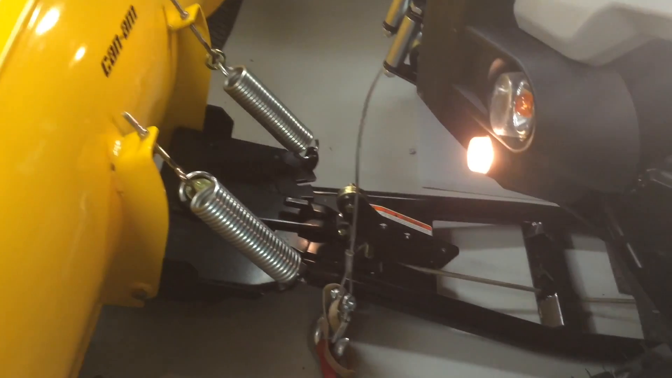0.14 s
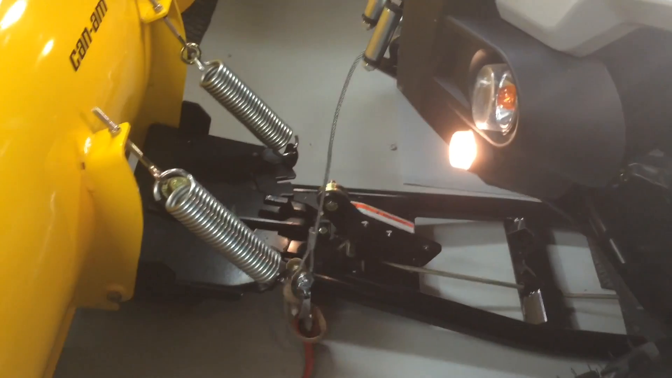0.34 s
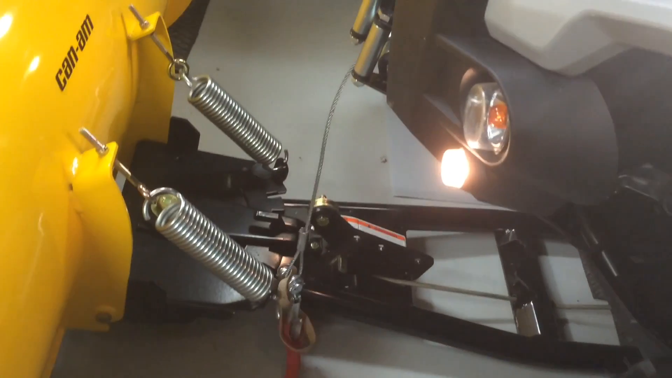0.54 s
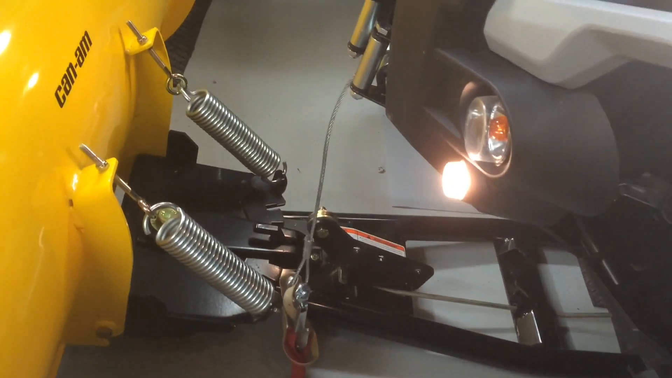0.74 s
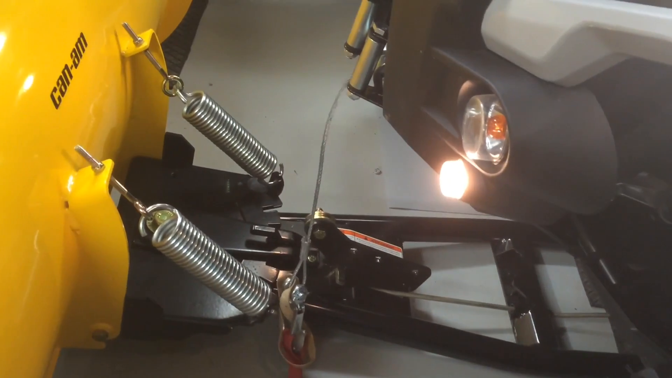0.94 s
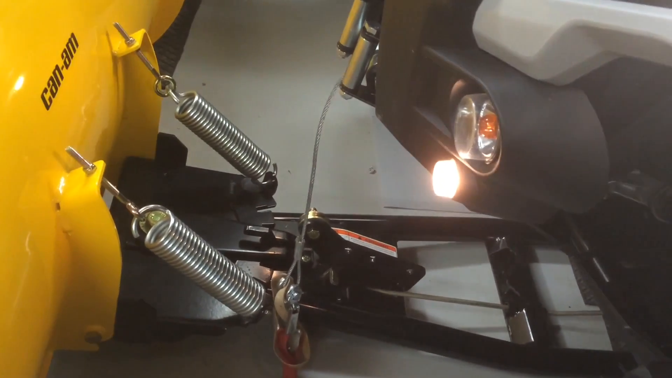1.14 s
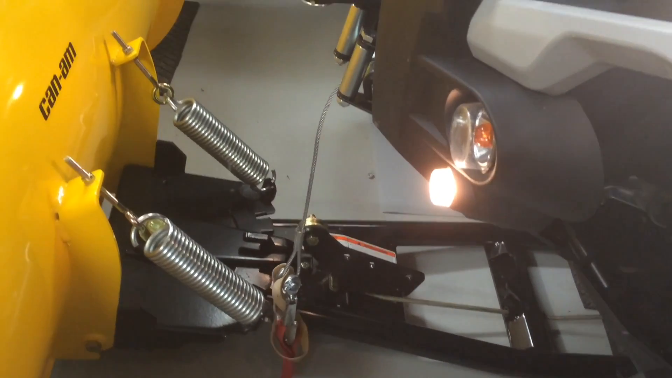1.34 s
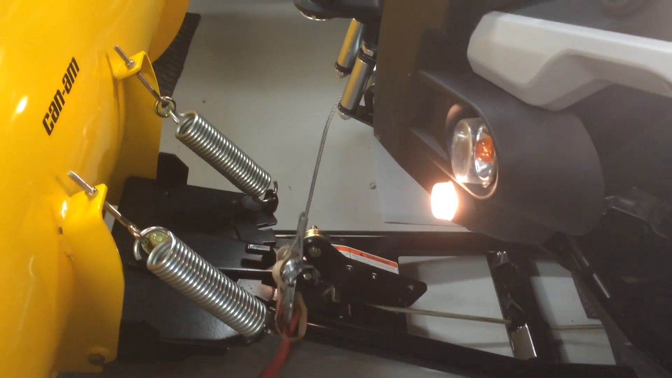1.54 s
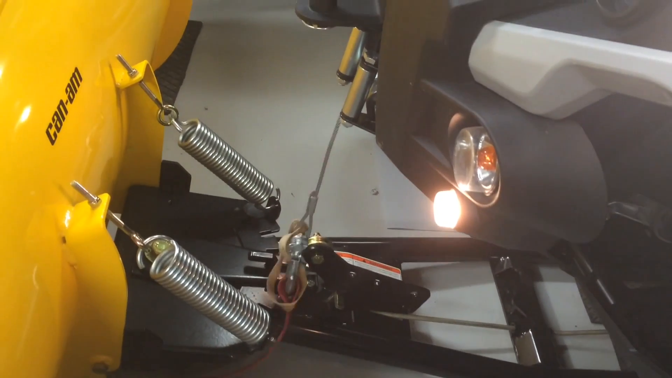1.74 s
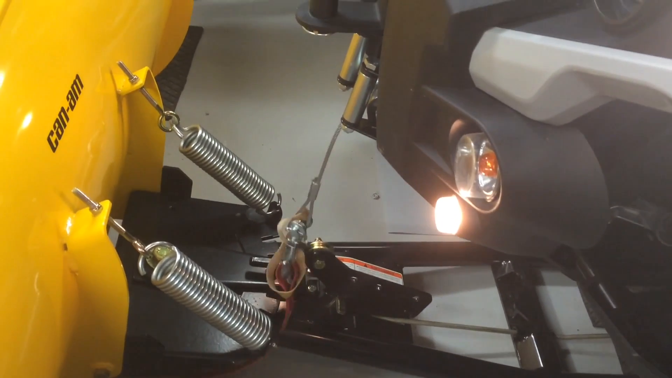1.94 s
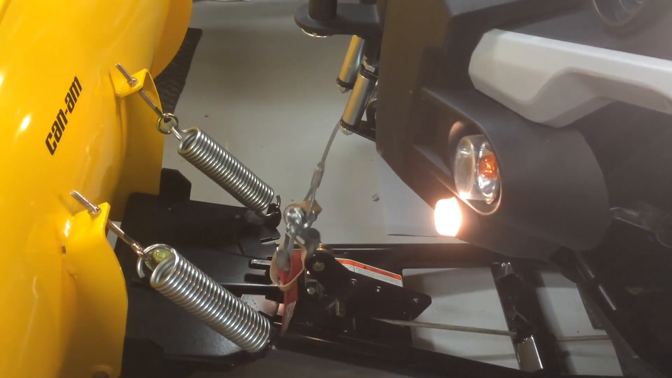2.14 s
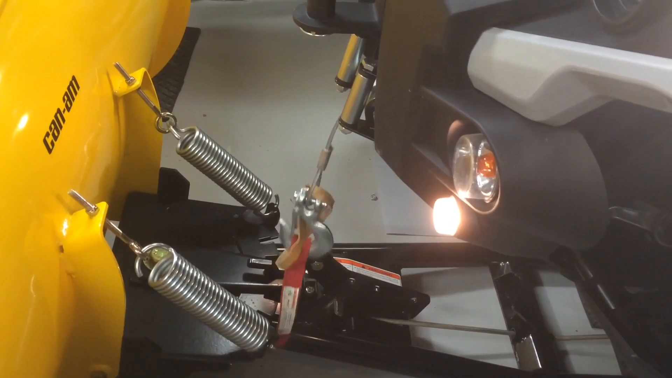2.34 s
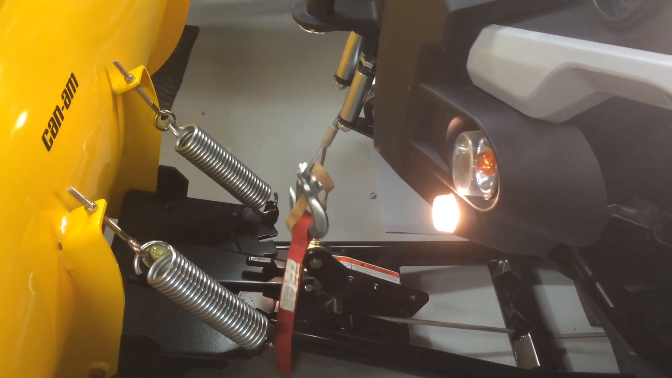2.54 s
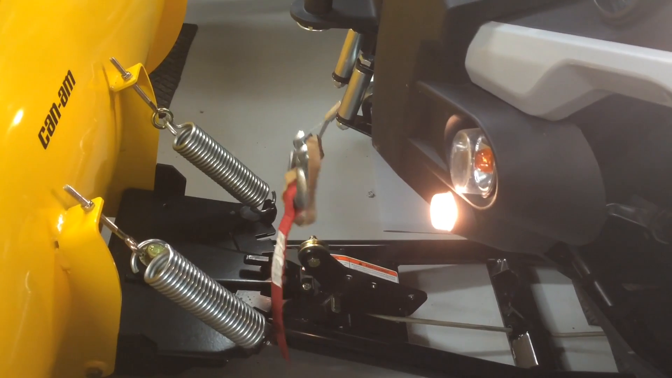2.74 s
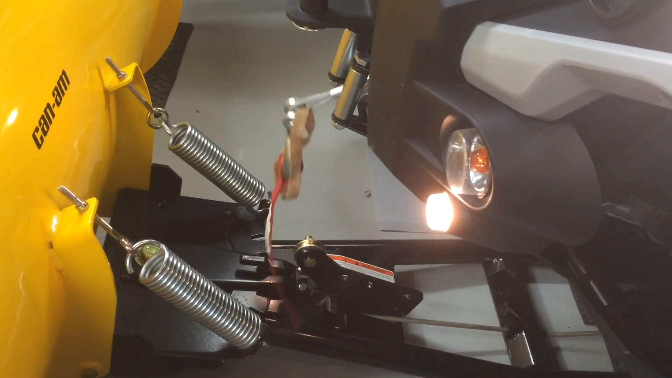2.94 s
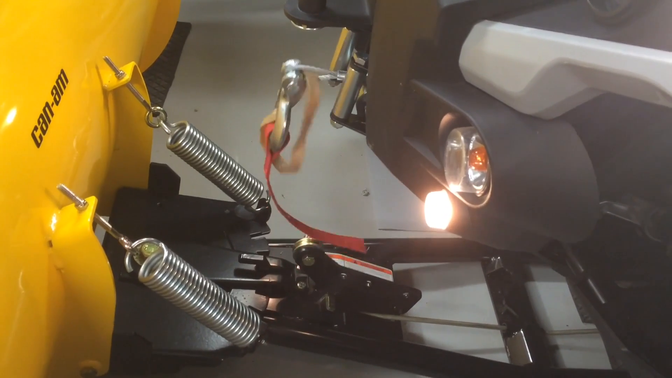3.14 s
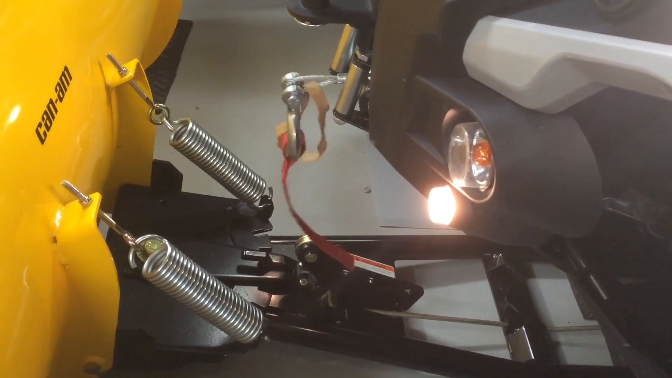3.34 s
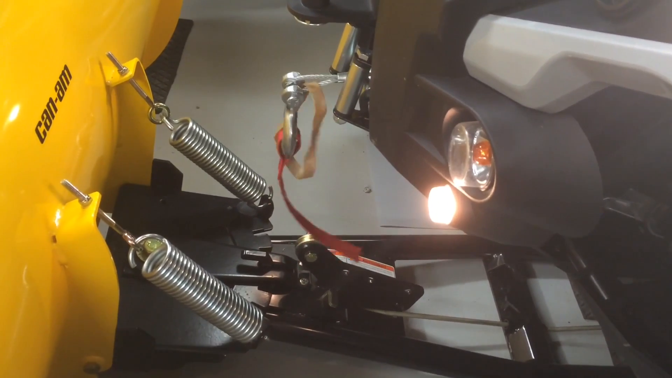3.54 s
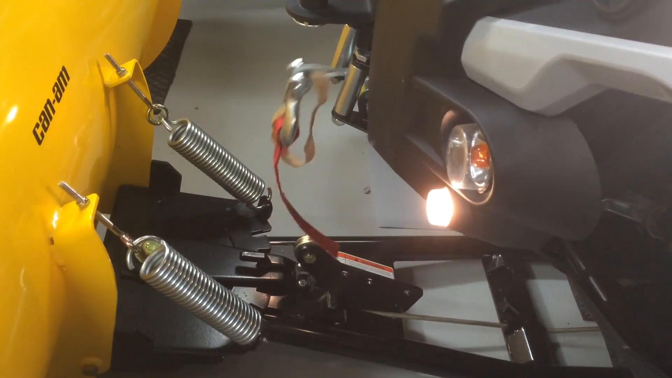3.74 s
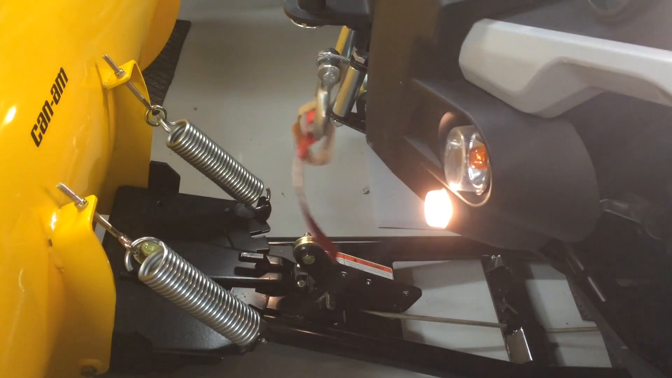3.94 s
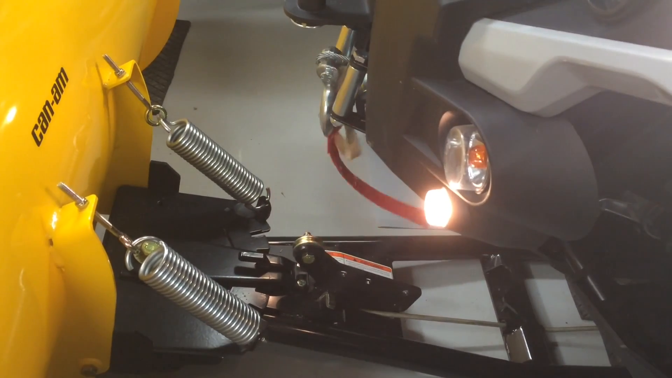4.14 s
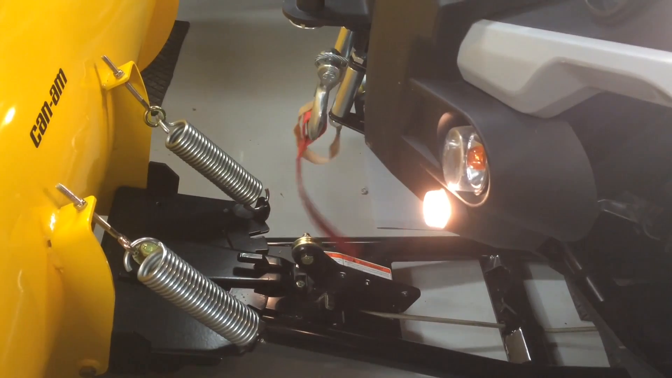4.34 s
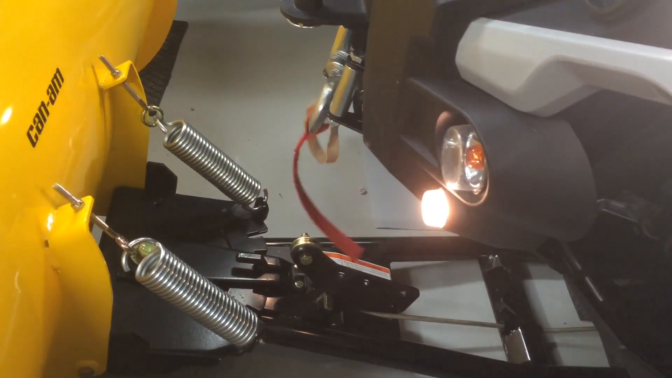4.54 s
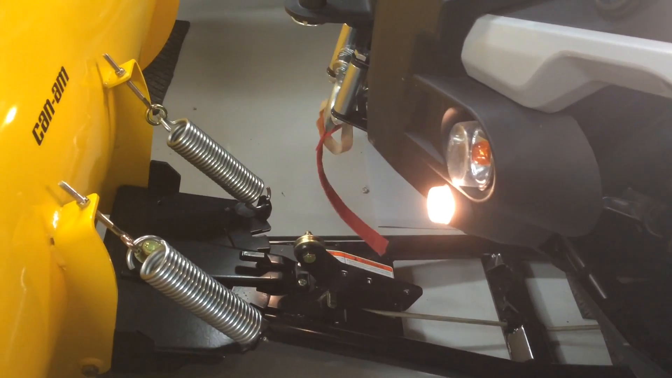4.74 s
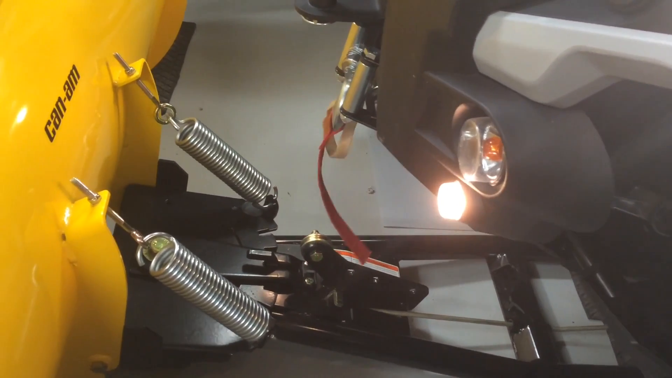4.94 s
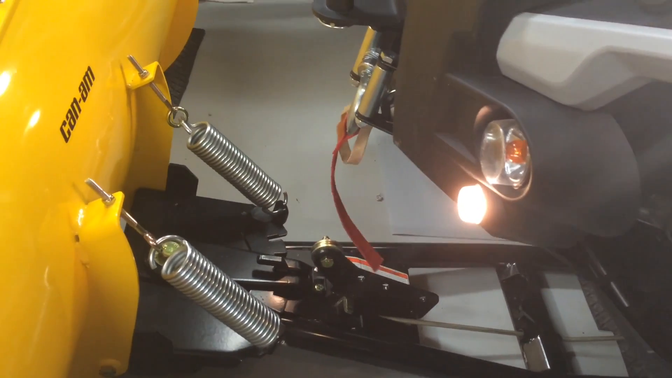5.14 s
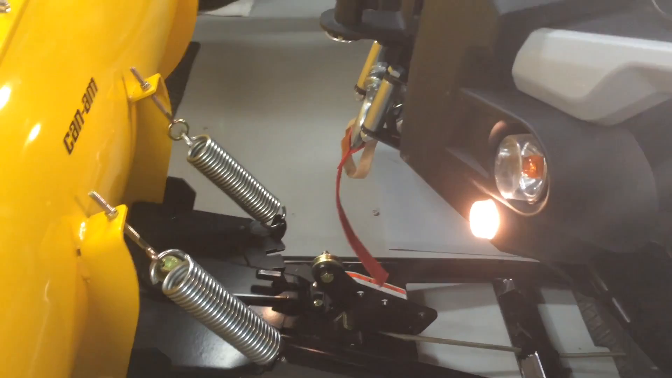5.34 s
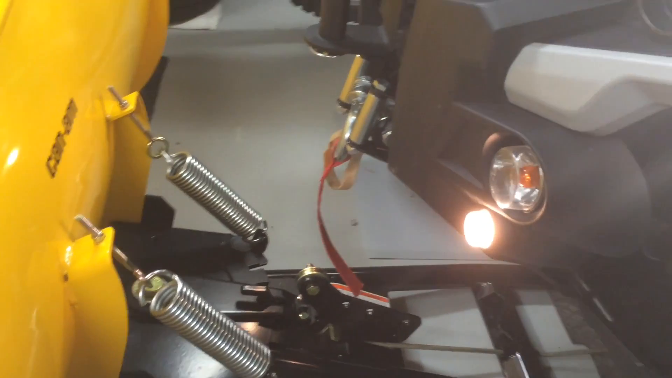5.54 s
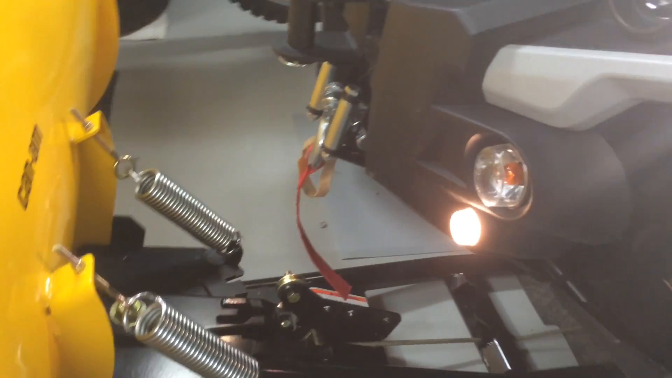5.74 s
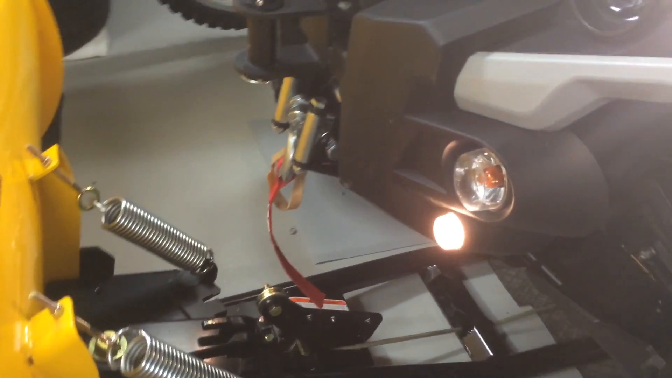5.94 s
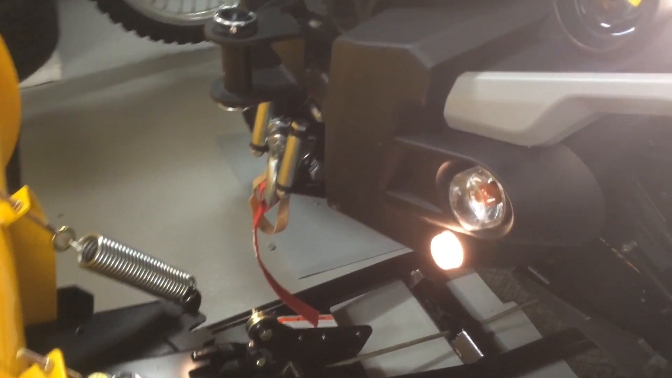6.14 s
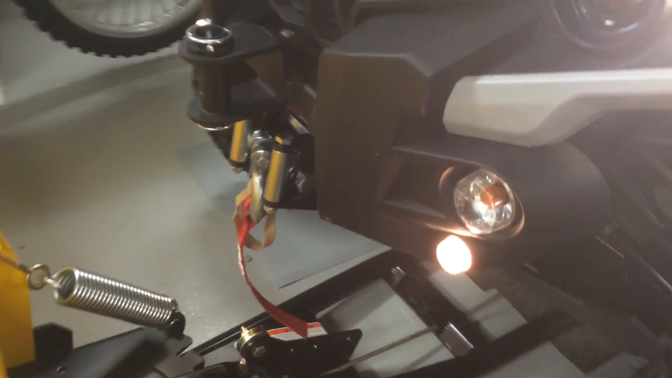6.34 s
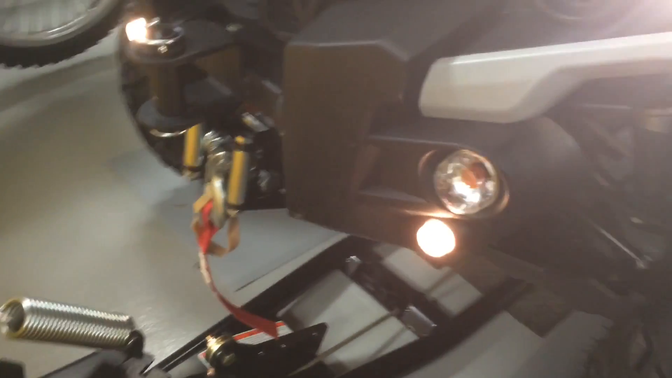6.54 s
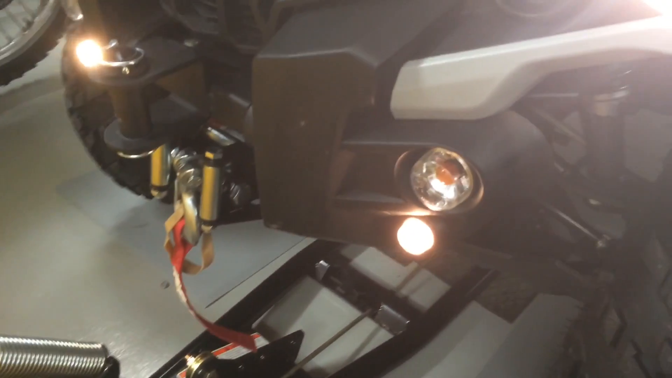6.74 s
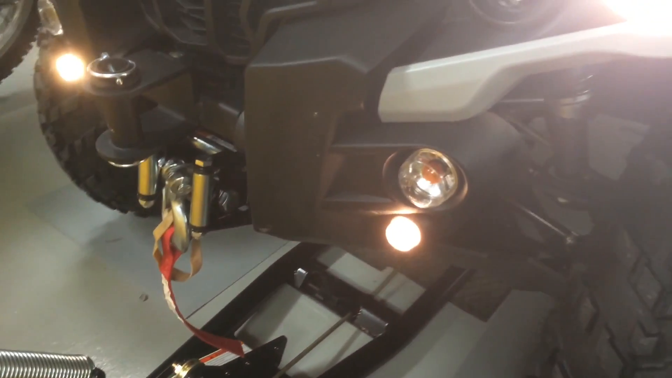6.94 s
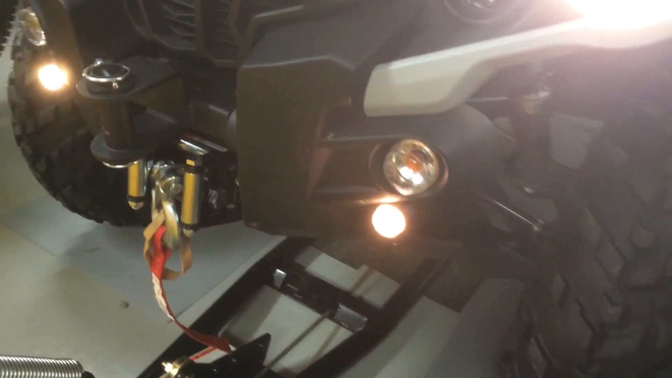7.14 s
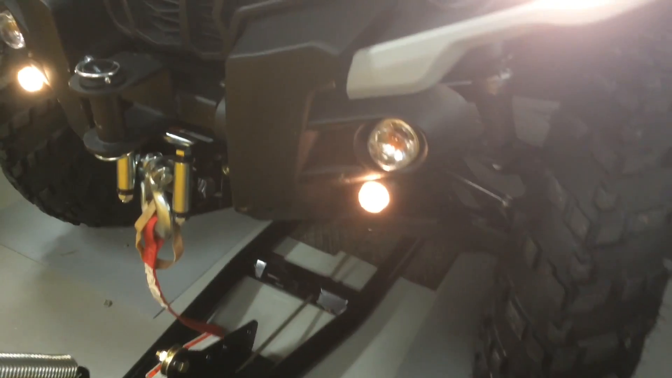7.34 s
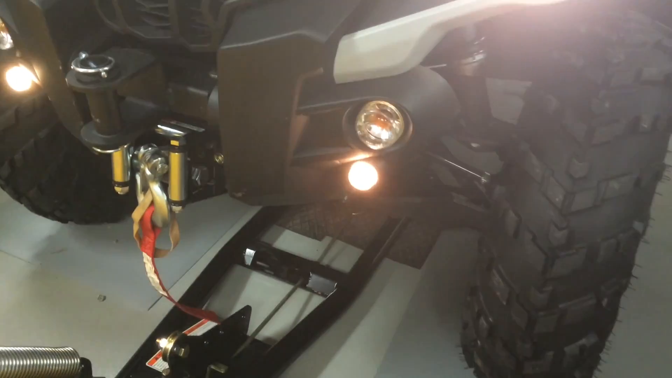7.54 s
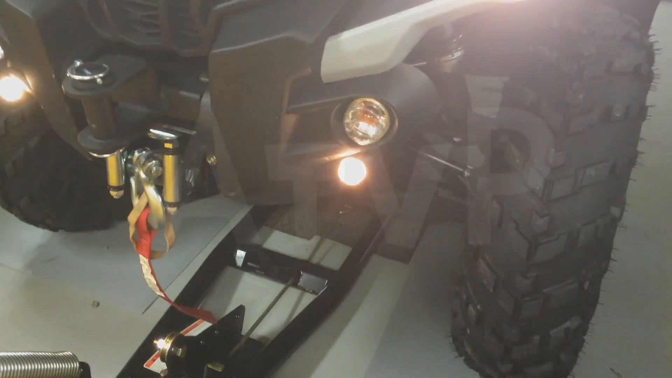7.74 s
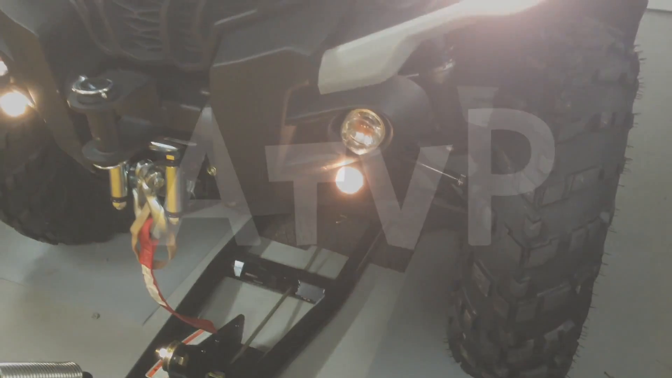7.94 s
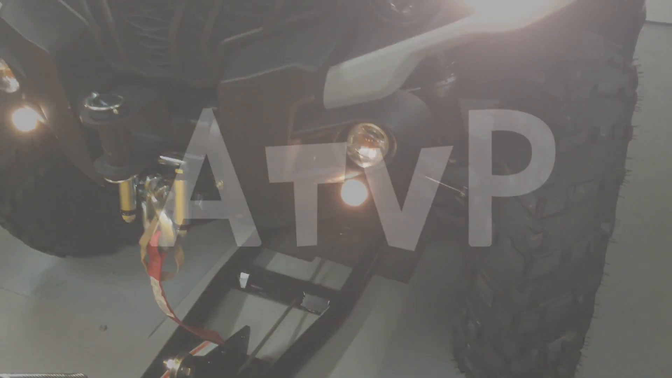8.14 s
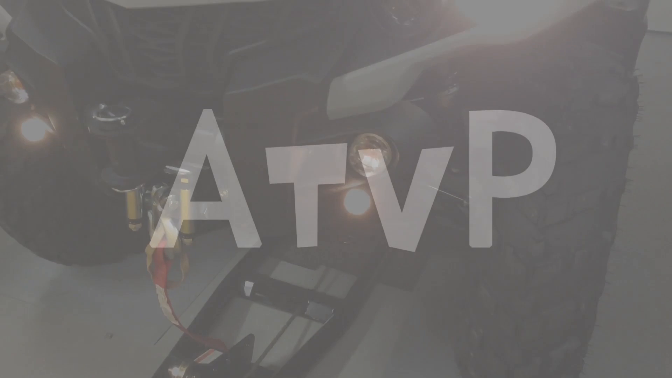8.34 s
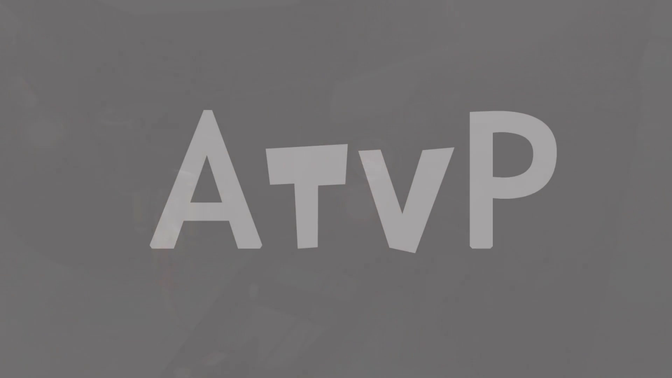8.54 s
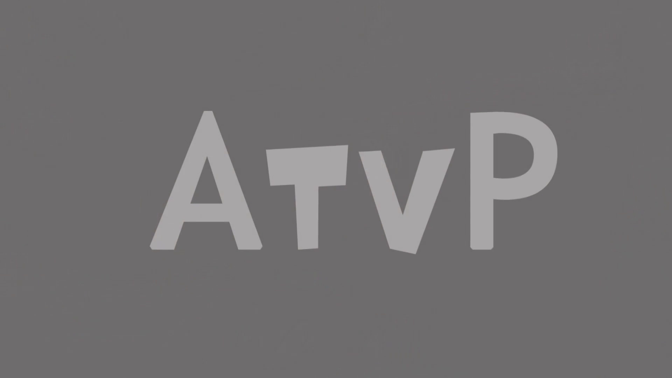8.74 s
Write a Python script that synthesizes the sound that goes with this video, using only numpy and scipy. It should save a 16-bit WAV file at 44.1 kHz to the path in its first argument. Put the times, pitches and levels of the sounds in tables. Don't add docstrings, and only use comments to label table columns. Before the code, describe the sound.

Sharp relay clacks start and stop a grinding winch motor, cable scraping and hook knocking metal, before faint taps and rustles over low hum fade away.

```python
import sys
import numpy as np
from scipy import signal
from scipy.fft import rfft, irfft, next_fast_len
from scipy.io import wavfile
from scipy.ndimage import map_coordinates

SR = 44100
rng = np.random.default_rng(int(sys.argv[2]) if len(sys.argv) > 2 else 0)


def volts(x):
    e = np.asarray(x, float) / 20
    return 10 ** e


def put_to_file(sound):
    columns = np.atleast_2d(sound).T
    safe = np.clip(columns, -1, 1)
    whole_steps = np.round(safe * 32767)
    wavfile.write(sys.argv[1], SR, whole_steps.astype(np.int16))


N = 387618
TIME = np.arange(N) / SR

# freq_hz, level_db (per Hz)
AIR = [(15, -33), (25, -9.5), (53, -7), (166, -18), (200, -18.5), (270, -21), (354, -22), (2050, -35.5),
       (2220, -39.5), (13600, -46.5), (16000, -56)]
# centre_hz, width_hz, level_db
DRONE_BANDS = [(97, 20, -8), (140, 36, -2.5), (196, 7.8, -2.5), (380, 260, -10.5)]
# on_s, off_s, slam_db, drop_db
RUNS = [
    (0.159, 0.674, 2, -4.5),
    (1.209, 3.086, 1, -4),
    (3.742, 3.987, 2.5, -4),
    (4.523, 4.664, 1.5, -5),
]
# mode_hz, level_db, t60_s
CASE = [(640, -3, .08), (860, 0, .06), (980, -2, .06), (1400, -3, .06), (1650, -5, .06), (2180, -4, .05),
        (3200, -4, .05), (5000, -8, .04), (5900, -10, .04)]
ORDERS = [2, 4, 9.96, 11, 12, 16, 19.92, 48]
ORDER_DB = [-52, -46, -42, -43, -45, -35.5, -39, -36]
# time_s, effort_db
LOAD = [(.2, -24), (.64, -27.5), (1.26, -24.5), (1.44, -28.5), (1.54, -22), (1.7, -19.5), (1.96, -25.5),
        (2.04, -22.5), (2.3, -21.5), (2.45, -23.5), (2.6, -28), (2.78, -25.5), (3.06, -29.5), (3.8, -28),
        (3.95, -26.5), (4.57, -26)]
# freq_hz, level_db (per Hz)
GEARS = [(240, -59.5), (400, -29.5), (734, -4.5), (1080, -5), (1180, -2.5), (1280, -6.5), (1540, -1.5),
         (2570, -13), (4000, -14.5), (5200, -40.5), (8800, -120)]
# freq_hz, level_db (per Hz)
SCRAPE = [(1180, -32.5), (2000, -2), (2690, -7.5), (4050, -4.5), (5780, -6.5), (10600, -12), (14900, -23.5),
          (15600, -34), (16000, -58)]
# freq_hz, level_db (per Hz)
DRUM = [(35, -44), (60, -18), (113, -8.5), (182, 2.5), (264, -6), (297, -9.5), (520, -12), (680, -37.5),
        (1140, -120)]
# centre_hz, width_hz, level_db
HOUSING = [(758, 14, 2.5), (890, 22, -3.5), (1210, 26, -7), (1511, 17, 1.5), (1600, 11, -4.5),
           (1708, 18, -8.5), (2160, 40, -10.5), (3170, 73, -6), (4210, 99, -12.5), (4660, 73, -16),
           (5030, 67, -19), (5920, 68, -19.5)]
# start_s, peak_db, body_hz, hardness_db
HOOK = [
    (.427, -1.5, 2090, 2),
    (.436, -6.5, 1742, 2.5),
    (.455, -11.5, 1499, -2),
    (.477, -12, 1800, -5),
    (.637, -7, 784, -6.5),
]
# mode_hz, level_db, t60_s
STEEL = [(410, -6, .15), (603, -4, .2), (800, -4, .12), (1420, -2, .15), (1970, 0, .15), (2100, -5, .2),
         (2500, -6, .15), (3800, -10, .07), (5020, -11, .1), (5900, -11, .08)]
# start_s, level_db
RINGS = [
    (0.426, -48.5),
    (.638, -39),
]
# mode_hz, level_db, t60_s
BLADE = [(470.2, -4.5, 1.2), (800, -3.5, 1.5), (822, 2, 2.2), (1061, -5, .7), (1174, -12, 1.1),
         (1427, -12, 1.5), (1523, -10.5, 1.5), (1745, -9.5, 2), (1938, -12, 2.6), (2089, -2.5, 2.5),
         (2118, -2.5, 2.4), (2500, -11, 1.9), (5389, -27, 2)]
# mode_hz, level_db, t60_s
ROLLERS = [(820, -9, 2.5), (1168, -5, 4), (1745, -5, 2.5), (2090, -6.5, 2.5), (2143, -13, 1.5),
           (2500, -13, 2)]
# start_s, peak_db
DRAGS = [(0.599, -23), (1.545, -17), (1.63, -18.5), (1.998, -19.5), (2.065, -16), (2.159, -19.5),
         (2.218, -18), (2.295, -15), (2.4, -17.5)]
# start_s,
# peak_db, body_hz, hardness_db
JOLTS = [(1.712, -4.5, 1300, -5), (1.724, -7, 1150, -4), (1.817, -8, 960, -0.5), (3.103, -10, 900, -3),
         (4.009, -15, 1000, -4.5), (4.039, -10, 1050, -0.5), (4.697, -10, 960, 7), (4.711, -19, 700, -16)]
# start_s, peak_db, body_hz, hardness_db
THUMB = [
    (1.104, -61, 3020, 8.5),
    (4.147, -29, 1528, 1),
    (4.481, -61, 1187, 1.5),
]
# start_s, peak_db, body_hz, hardness_db
STEP = [
    (7.403, -43, 900, -6),
    (7.413, -33.5, 1270, 0.5),
    (7.43, -33.5, 827, -4),
]
# start_s, peak_db, body_hz, hardness_db
TAPS = [(3.239, -49, 2540, 5), (3.319, -50, 2520, 7), (4.307, -55.5, 2480, 9), (4.93, -53.5, 1500, 4),
        (5.383, -59.5, 2500, 7), (5.47, -54, 1300, 3), (6.028, -50.5, 800, -6.5), (6.159, -58, 2500, 3),
        (6.329, -48.5, 750, -7), (6.605, -44.5, 1800, 6.5), (7.11, -50, 740, -5), (7.931, -59, 1200, -2),
        (8.116, -52.5, 1498, 3.5), (8.187, -54, 1250, -10), (8.313, -64, 2000, 4.5),
        (8.509, -53, 1800, -1.5)]
# peak_s, rise_s, level_db, brightness_db
RUSTLES = [(4.94, 0.024, -61, 1), (5.489, 0.019, -57.5, -4), (5.87, 0.048, -55.5, 2.5),
           (6.04, 0.031, -66, 1.5), (6.36, 0.036, -64, 2), (6.62, 0.085, -56.5, 4), (7.14, 0.031, -63.5, 0),
           (7.429, 0.011, -43, -6), (8.13, .02, -55, -8), (8.33, 0.017, -63, 0)]
# freq_hz, t60_s
GARAGE = [(150, 0.57), (1000, 0.48), (4000, 0.35), (12000, .22)]

SHAFT_HZ = 75.87
SWITCH_LEAD_S, SWITCH_DB = .026, -49.5
TOUCH_LEAD_S, TOUCH_DB = .0115, -4
ARC_LEAD_S, ARC_DB = .017, -3.5
SCRAPE_DB, SCRAPE_GROWS, DRUM_DB, DRUM_GROWS = -3.5, 0.99, -14.5, 0.21
STIR_DB, STIR_BRIGHT_DB = -77.5, -0.5
RUSTLE_FALL, RUSTLE_TAIL_S = 0.36, 0.042
HUM_DB, DRONE_DB, RUMBLE_DB = -50.5, -56, -57.5
BEAT_S, BEAT_TOP_S, BEAT_DEPTH = 2.7, 7.2, .45
FADE_FROM_S, FADE_TO_S = 7.6, 8.655


def unit(x):
    return x / np.sqrt(np.mean(x ** 2) + 1e-20)


def along(points, hz):
    f, v = np.transpose(points)
    return np.interp(np.log(hz + 1), np.log(f + 1), v)


def wobble(rate, size=N):
    coarse = TIME[:size:16]
    knots = rng.standard_normal(int(size * rate / SR) + 4)
    return np.interp(TIME[:size], coarse, map_coordinates(knots, [coarse * rate]))


def filtered(x, response):
    m = next_fast_len(N + SR // 2)
    return irfft(rfft(x, m) * response(np.fft.rfftfreq(m, 1 / SR)), m)[:N]


def noise(response, size=N):
    m = next_fast_len(size)
    spectrum = rfft(rng.standard_normal(m)) * response(np.fft.rfftfreq(m, 1 / SR))
    return unit(irfft(spectrum, m)[:size])


def band(hz, octaves):
    return lambda f: np.exp(-8 * (np.log2((f + 1) / hz) / octaves) ** 4)


def dull(f):
    return band(6000, 2.7)(f) * (f + 1) ** -.85


def ring(modes, t):
    total = 0
    for hz, db, t60 in modes:
        total = total + volts(db + 3 * rng.normal() - 60 * t / t60) * np.sin(2 * np.pi * hz * t)
    return total


def knocks(events, modes, low, snap, ring_db, rise_s, octaves, gain_db, thud_db, snap_db, t60):
    out, t = np.zeros(N + SR), np.arange(SR // 3) / SR
    fall_db = -60 * t / max(t60, .01)
    for s, db, body_hz, hard_db in events:
        at = round((s - rise_s) * SR)
        body = noise(band(body_hz, octaves), size=len(t))
        thud = noise(low, size=len(t))
        crack = noise(snap, size=len(t))
        blow = volts(fall_db) * body
        blow += volts(thud_db - hard_db + fall_db / 3.8) * thud
        blow += volts(snap_db + hard_db + fall_db / .8) * crack
        near = [(hz, level - 6 * abs(np.log2(hz / body_hz)), life) for hz, level, life in modes]
        attack = 1 - np.exp(-t / rise_s)
        out[at:at + len(t)] += volts(db + gain_db) * attack * (blow + volts(ring_db) * ring(near, t))
    return out[:N]


def shimmer(modes, s, waver_db):
    at = round(s * SR)
    out, t = np.zeros(N), TIME[:SR]
    for hz, db, t60 in modes:
        drift = wobble(20, size=2 * len(t))
        level = volts(db + waver_db * drift[:len(t)] - 60 * t / t60)
        out[at:at + len(t)] += level * np.sin(2 * np.pi * hz * t + .8 * drift[-len(t):])
    return out


def speed():
    up = np.zeros(N)
    for on, off, *_ in RUNS:
        spin_up = 1 - np.exp(-np.clip(TIME - on, 0, off - on) / .025)
        brake = np.exp(-np.clip(TIME - off, 0, None) / .03)
        up += (TIME > on) * spin_up * brake
    return np.clip(up, 0, 1)


def garage_air():
    beat = 1 + BEAT_DEPTH * np.cos(2 * np.pi * (TIME - BEAT_TOP_S) / BEAT_S)
    hum = volts(HUM_DB + wobble(4.6)) * beat * np.sin(2 * np.pi * 48.6 * TIME + .8 * wobble(4))
    drone = np.zeros(N)
    for hz, wide, db in DRONE_BANDS:
        drone += volts(db) * noise(lambda f: 1 / (1 + ((f - hz) / wide * 2) ** 2))
    rumble = noise(lambda f: volts(along(AIR, f)) / (1 + (60 / (f + 1)) ** 4))
    return hum + volts(DRONE_DB + 1.1 * wobble(2.5)) * drone + volts(RUMBLE_DB + 1.1 * wobble(2.5)) * rumble


def handling():
    switch = [(on - SWITCH_LEAD_S, SWITCH_DB, 3000, 12) for on, *_ in RUNS]
    return knocks(switch + list(THUMB) + list(STEP) + list(TAPS), [], band(230, 0.9), dull,
                  ring_db=-30.5, rise_s=.0005, octaves=2.1, gain_db=3.5, thud_db=-8.5, snap_db=-7, t60=.05)


def contactor():
    wide = lambda f: band(7500, 2.9)(f) * (f + 1) ** -.25
    bright = lambda f: band(8000, 2.6)(f) * (1 + 0.83 * band(12200, .5)(f))
    frame = lambda f: band(160, 1.4)(f) + 0.35 * band(185, .6)(f)
    on, off, slam_db, drop_db = np.transpose(RUNS)
    rows = lambda s, db, hz: [(a, b, hz, 0) for a, b in zip(s, db)]
    touch = knocks(rows(on - TOUCH_LEAD_S, slam_db + TOUCH_DB, hz=1800), CASE, frame, bright,
                   ring_db=-15.5, rise_s=0.00092, octaves=1.9, gain_db=-9.0, thud_db=-33.5, snap_db=3, t60=0.17)
    slam = knocks(rows(on + .001, slam_db, hz=1330), CASE, frame, wide,
                  ring_db=-5.5, rise_s=0.0011, octaves=2.3, gain_db=-4.5, thud_db=-16, snap_db=2, t60=0.068)
    arc = knocks(rows(off - ARC_LEAD_S + .004, drop_db + ARC_DB, hz=1300), [], frame, band(6600, 1.5),
                 ring_db=-20, rise_s=.003, octaves=2.2, gain_db=-10, thud_db=-25, snap_db=4, t60=.13)
    drop = knocks(rows(off + .002, drop_db, hz=910), CASE, frame, dull,
                  ring_db=-5, rise_s=.004, octaves=2.0, gain_db=-0.5, thud_db=-18.5, snap_db=-1.0, t60=.065)
    return touch + slam + arc + drop


def whine():
    size = 5 * SR
    share = speed()[:size]
    shaft_hz = SHAFT_HZ * share * (1 + .0004 * wobble(10, size=size))
    angle = 2 * np.pi * np.cumsum(shaft_hz) / SR
    tones = np.zeros(size)
    for order, db in zip(ORDERS, ORDER_DB):
        phase = order * angle + .2 * wobble(40, size=size)
        tones += volts(db + 1.2 * wobble(15, size=size)) * np.sin(phase)
    return np.pad(np.sqrt(2) * share ** 6 * tones, (0, N - size))


def housing(f):
    return .5 + abs(sum(volts(.5 * db) * f * w / (c * c - f * f + 1j * f * w) for c, w, db in HOUSING))


def winch():
    effort_db = np.interp(TIME, *np.transpose(LOAD))
    usual_db = np.mean(LOAD, 0)[1]
    swing_db = effort_db - usual_db
    teeth = rng.standard_normal(N) * volts(3 * np.tanh(wobble(350)) + wobble(40) + 1.3 * wobble(13))
    teeth *= 1 + 0.22 * np.sin(np.pi * SHAFT_HZ * TIME)
    grind = unit(filtered(teeth, lambda f: volts(along(GEARS, f)) * housing(f)))
    grit = rng.standard_normal(N) * volts(2.7 * wobble(500) + 1.8 * wobble(25))
    scrape = unit(filtered(grit, lambda f: volts(along(SCRAPE, f)) * housing(f)))
    drum = noise(lambda f: volts(along(DRUM, f)))
    mix = volts(effort_db) * grind
    mix += volts(usual_db + SCRAPE_DB + SCRAPE_GROWS * swing_db) * scrape
    mix += volts(usual_db + DRUM_DB + DRUM_GROWS * swing_db + 2.5 * wobble(12)) * drum
    return speed() * mix


def hook():
    bracket = band(400, 0.98)
    clank = lambda f: dull(f) * (1 + 1.5 * band(5500, .6)(f))
    on_blade = knocks(HOOK, STEEL, bracket, clank, ring_db=-8.5, rise_s=0.00077, octaves=1.5,
                      gain_db=1.0, thud_db=-22.5, snap_db=-7.5, t60=0.054)
    skips = knocks([(s, db, 2600, 0) for s, db in DRAGS], [], bracket, dull, ring_db=0, rise_s=0.0062,
                   octaves=3.2, gain_db=-1, thud_db=-19, snap_db=-0.5, t60=0.099)
    jolts = knocks(JOLTS, CASE, bracket, dull, ring_db=-3, rise_s=.0008, octaves=2.1,
                   gain_db=-1.1, thud_db=-21.5, snap_db=-12, t60=.07)
    return on_blade + skips + jolts


def resonance():
    last_blow_s, pull_end_s = RINGS[-1][0], RUNS[1][1]
    blade = sum(volts(db) * shimmer(BLADE, s, waver_db=4.5) for s, db in RINGS)
    rollers = volts(-52.5) * shimmer(ROLLERS, pull_end_s, waver_db=1.5)
    plate = noise(lambda f: band(1200, 3.5)(f) / (1 + (f / 2550) ** 20))
    wash = np.zeros(N)
    for s, db in [(last_blow_s, -38), (pull_end_s, -54)]:
        wash += volts(db - 60 * np.clip(TIME - s, 0, None) / 2.0) * (TIME > s)
    return blade + wash * plate + rollers


def shuffling():
    low = volts(STIR_DB + 1.2 * wobble(4))
    high = volts(STIR_DB + STIR_BRIGHT_DB + 1.2 * wobble(4))
    for s, rise_s, db, bright_db in RUSTLES:
        fall_s = RUSTLE_FALL * rise_s + RUSTLE_TAIL_S
        stroke = volts(db) * np.exp(np.minimum((TIME - s) / rise_s, (s - TIME) / fall_s))
        low = low + stroke
        high = high + volts(bright_db) * stroke
    rub = volts(2 * wobble(36) + 1.65 * wobble(300))
    bright = noise(lambda f: band(6500, 3.2)(f) * (f + 1) ** -.3)
    return rub * (low * noise(band(870, 3.2)) + high * bright)


def garage(x):
    hz, t, z = signal.stft(rng.standard_normal((2, SR * 3 // 4)), SR, nperseg=256)
    tails = signal.istft(z * volts(-60 * t / along(GARAGE, hz)[:, None]), SR, nperseg=256)[1]
    sway = 2 * np.pi * 1.7 * TIME
    parts = x * np.array([np.sin(sway), np.cos(sway)])
    parts = np.pad(parts, ((0, 0), (300, 0)))
    return signal.fftconvolve(parts, tails / np.linalg.norm(tails[0]), axes=1).sum(0)[:N]


def scene():
    blows = handling() + contactor() + hook()
    tones, motor = whine(), winch()
    wet = garage(volts(-9.0) * blows + volts(-6) * motor + volts(-16.5) * tones)
    return (garage_air() + blows + tones + motor + wet + resonance() + shuffling())[None]


def band_limit(x):
    return signal.sosfilt(signal.butter(12, 16460, fs=SR, output="sos"), x)


def record(dry):
    loud = volts(-5) * dry[0]
    limited = loud / (1 + abs(loud / .88) ** 6) ** (1 / 6)
    edged = filtered(limited, lambda f: volts(-32 * np.clip((f - 15100) / 500, 0, 1)))
    fade = np.clip((FADE_TO_S - TIME) / (FADE_TO_S - FADE_FROM_S), 0, 1)
    return band_limit(edged[None] * fade)


dry = scene()
out = record(dry)
put_to_file(out)
```